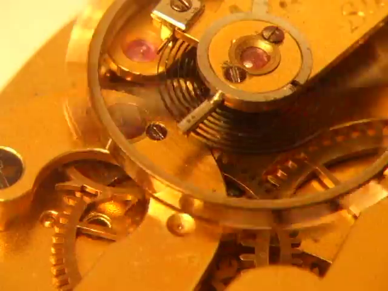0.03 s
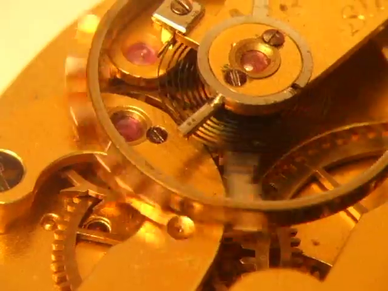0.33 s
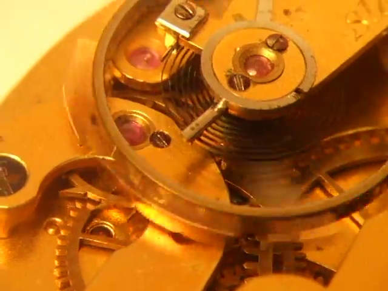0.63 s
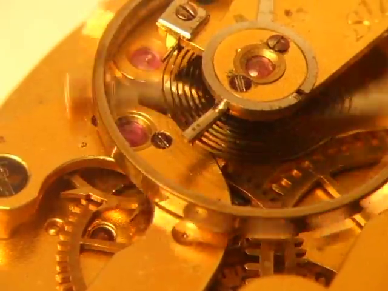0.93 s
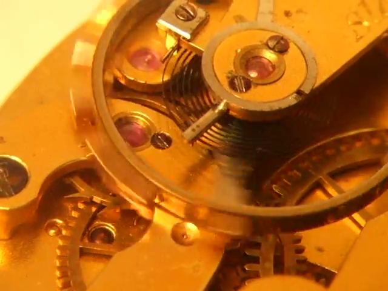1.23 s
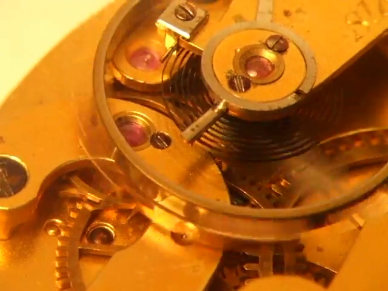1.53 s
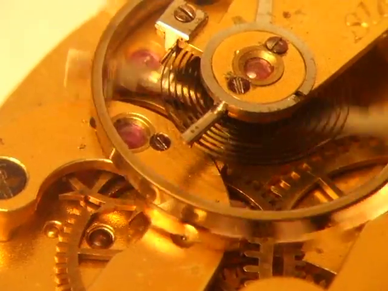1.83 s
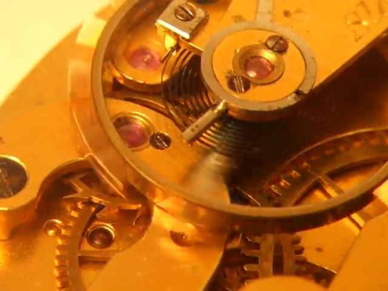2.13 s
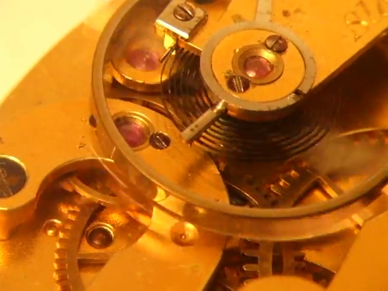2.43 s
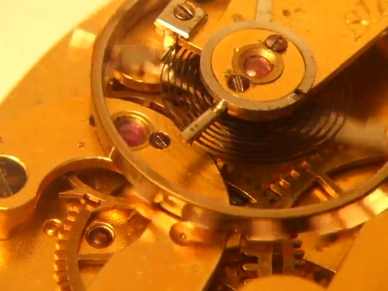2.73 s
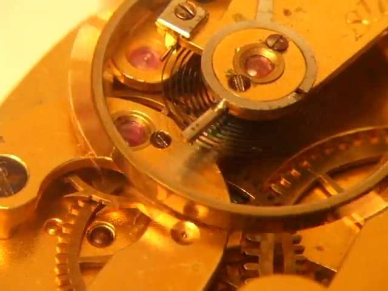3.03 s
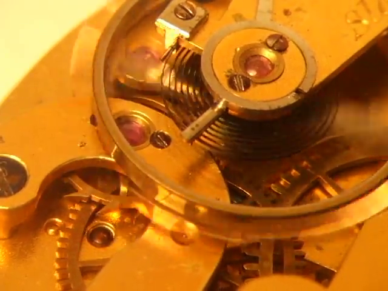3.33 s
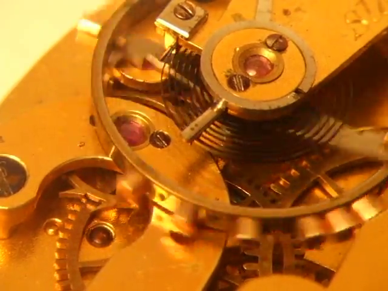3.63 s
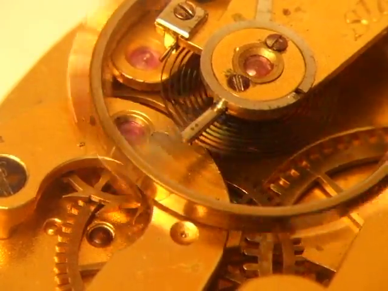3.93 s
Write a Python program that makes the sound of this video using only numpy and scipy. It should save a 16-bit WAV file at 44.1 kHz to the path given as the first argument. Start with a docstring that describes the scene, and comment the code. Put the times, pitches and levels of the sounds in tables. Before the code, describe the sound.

Quick, crisp ticking of an open pocket watch, close up, with soft hiss behind.

```python
"""Pocket watch, close up

An open watch beats 4.5 times a second: a strong tick, with a second contact 11 ms later, alternates
with a softer tock. Each contact chatters and rings the movement; a spring sings faintly in between.
Room hiss, hum and a thin electronic whine pass with it through a small camera's coarse 16 kHz converter."""
import sys
import numpy as np
from scipy import signal
from scipy.fft import rfft, irfft
from scipy.io import wavfile

SR = 44100
rng = np.random.default_rng(int(sys.argv[2]) if len(sys.argv) > 2 else 0)


def to_wav(s):
    """Save 16-bit WAV."""
    ch = np.atleast_2d(s).T  # columns
    pcm = np.round(np.clip(ch, -1, 1) * 32767)  # PCM
    wavfile.write(sys.argv[1], SR, pcm.astype(np.int16))


N = 176400
CONVERTER_HZ = 16000


def from_db(db):
    """Decibels to gain."""
    return 10 ** (np.asarray(db) / 20)


def clicks(times_s, levels_db):
    """Train of single-sample impulses."""
    out = np.zeros(N)
    index = np.round(np.ravel(times_s) * SR).astype(int)
    np.add.at(out, np.clip(index, 0, N - 1), from_db(np.ravel(levels_db)))
    return out


def ring(drive, hz, t60_s, band_hz=1650):
    """One decaying mode, band-passed so it swells over a few cycles and sounds thin."""
    radius = np.exp(-np.log(1000) / (t60_s * SR))
    angle = 2 * np.pi * hz / SR
    guard = 1e-18  # against denormals
    mode = signal.lfilter([0, np.sin(angle)], [1, -2 * radius * np.cos(angle), radius ** 2], drive + guard)
    edges_hz = [max(hz - band_hz / 2, hz / 2), hz + band_hz / 2]
    band = signal.butter(2, edges_hz, "band", fs=SR, output="sos")
    return signal.sosfilt(band, mode + guard * (np.arange(N) % 2))


# Hiss spectrum: frequency_hz, relative_density_db
HISS_SPECTRUM = [(25, 2.5), (50, 1), (90, -1), (280, 2.5), (430, 0.5), (570, 2), (750, -4.5), (1300, -8),
                 (2600, -12.5), (5000, -15.5), (7000, -10.5), (8000, -7)]


def hiss(rms_db=-56.5):
    """Steady room and microphone noise, strongest in the bass."""
    hz, density_db = np.transpose(HISS_SPECTRUM)
    bins_hz = np.maximum(np.arange(N // 2 + 1) * SR / N, 1)
    gain = from_db(np.interp(np.log(bins_hz), np.log(hz), density_db)) * (bins_hz < CONVERTER_HZ / 2)
    noise = irfft(rfft(rng.standard_normal(N)) * gain, N)
    return from_db(rms_db) * noise / noise.std()


# Room hum: pitch_hz, rms_db
HUM_TONES = [(120, -70), (158, -67.5), (236, -75), (314, -74.5), (800, -82.5)]
# Electronic whine: pitch_hz, rms_db
WHINE_TONES = [(7648, -81), (7678, -73), (7692, -78), (7707, -74), (7736, -82)]


def hum_and_whine():
    """Steady sines: low room hum and a thin electronic cluster near 7.7 kHz."""
    t = np.arange(N) / SR
    return sum(np.sqrt(2) * from_db(rms_db) * np.sin(2 * np.pi * (hz * t + rng.random()))
               for hz, rms_db in HUM_TONES + WHINE_TONES)


# Spring modes before a tock: pitch_hz, level_db, t60_s
PRE_TOCK_MODES = [(6835, -53.5, .1), (6760, -62, .03)]
# Spring modes after a tick: pitch_hz, level_db, t60_s
POST_TICK_MODES = [(2975, -59, .08), (5560, -61, .08), (6730, -58, .07), (6880, -59, .05), (7135, -56, .12)]


def spring(after_tick_s=.0347, before_tock_s=.0278, jitter_s=.001, spread_db=2.5):
    """Two light, uneven touches per full balance swing ring a spring, probably the hairspring."""
    touches = ((np.array(TICK_BEATS)[:, 0] + after_tick_s, POST_TICK_MODES),
               (np.array(TOCK_BEATS)[:, 0] - before_tock_s, PRE_TOCK_MODES))
    out = np.zeros(N)
    for times_s, modes in touches:
        for hz, level_db, t60_s in modes:
            late, loud = rng.standard_normal((len(times_s), 2)).T
            out += ring(clicks(times_s + jitter_s * late, level_db + spread_db * loud), hz, t60_s)
    return out


# Movement modes: pitch_hz, t60_s, tick_db, second_contact_db, tock_db
MOVEMENT_MODES = [(2986, .035, -50.5, -60.5, -65), (3420, 0.01, -42.5, -50.5, -59.5),
                  (3728, .014, -49.5, -47.5, -59), (4654, 0.026, -53.5, -51.5, -62.5),
                  (5617, 0.029, -46.5, -44.5, -52.5), (5910, 0.017, -41, -49.5, -55.5),
                  (6340, 0.014, -33.5, -47.5, -54), (6620, .014, -32.5, -44, -45),
                  (6890, .014, -32, -39.5, -43), (7123, 0.0024, -17, -28.5, -35.5),
                  (7355, 0.013, -36, -47, -54), (7515, .011, -30.5, -43, -44), (7530, .012, -33, -33, -38)]


def contact(times_s, levels_db, chatter, modes_db, jitter_s=.00009, spread_db=1.2, mode_spread_db=1.0):
    """Each contact is a few uneven impacts, each ringing every mode of the movement."""
    delay_s, relative_db = np.transpose(chatter)
    shape = (len(times_s), len(delay_s))
    uneven = delay_s != 0
    impact_s = times_s[:, None] + delay_s + jitter_s * rng.standard_normal(shape) * uneven
    impact_db = levels_db[:, None] + relative_db + spread_db * rng.standard_normal(shape) * uneven
    out = np.zeros(N)
    for (hz, t60_s, *_), mode_db in zip(MOVEMENT_MODES, modes_db):
        drive_db = impact_db + mode_db + mode_spread_db * rng.standard_normal(shape)
        out += ring(clicks(impact_s, drive_db), hz, t60_s)
    return out


# Strong beats: start_s, relative_db, second_contact_delay_s
TICK_BEATS = [(.2963, -1.5, .0112), (.7419, 1.5, .0103), (1.1862, 0, .0111), (1.6313, -.5, .0109),
              (2.0760, 0, .0111), (2.5212, 1.2, .0107), (2.9661, .4, .0115), (3.4113, 1.8, .011),
              (3.8561, -.2, .0109)]
# Soft beats, on the other pallet: start_s, relative_db
TOCK_BEATS = [(0.0804, 0.5), (0.524, -0.8), (0.9683, 1), (1.413, -0.5), (1.8594, -4.5), (2.3032, -5),
              (2.7506, -4), (3.1936, -1.8), (3.6389, -0.5)]
# Impacts within a tick, second contact and tock: delay_s, relative_db
TICK_IMPACTS = [(0, 0), (.00095, -7), (.0019, -19), (.0031, -16), (.0057, -22), (.0078, -26)]
SECOND_IMPACTS = [(-.001, -8), (0, 0), (.0013, -6), (.0025, -10)]
TOCK_IMPACTS = [(-.0004, -2), (.0005, 0), (.0014, -1), (.0024, -5)]


def escapement(tick_gain_db=6, second_gain_db=5.5, tock_gain_db=7.5):
    """Tick, second contact and tock strike the movement at different places, weighting its modes."""
    tick_s, tick_db, second_delay_s = np.transpose(TICK_BEATS)
    tock_s, tock_db = np.transpose(TOCK_BEATS)
    second_db = np.full(len(tick_s), second_gain_db)
    _, _, tick_modes_db, second_modes_db, tock_modes_db = np.transpose(MOVEMENT_MODES)
    return (contact(tick_s, tick_db + tick_gain_db, TICK_IMPACTS, tick_modes_db)
            + contact(tick_s + second_delay_s, second_db, SECOND_IMPACTS, second_modes_db)
            + contact(tock_s, tock_db + tock_gain_db, TOCK_IMPACTS, tock_modes_db))


# Stray clicks: start_s, level_db
STRAY_IMPACTS = [(0.6313, -28), (0.6398, -28)]


def stray_clicks():
    """Two tiny dry clicks between beats."""
    return ring(clicks(*np.transpose(STRAY_IMPACTS)), hz=6600, t60_s=.002)


def scene():
    """Watch over a quiet room, mono."""
    watch = escapement() + spring() + stray_clicks()
    return (watch + hiss() + hum_and_whine())[None]


def record(dry, step_db=-45.5, offset_steps=-.47, start_s=.032, fade_s=.008, cutoff_hz=9400):
    """Coarse converter steps make the hiss gritty; the smoothing filter mirrors some treble above 8 kHz."""
    up, down = 160, 441  # CONVERTER_HZ / SR
    smoothing = signal.firwin(32 * down + 1, 1 / down, window=("kaiser", 9))
    sampled = signal.resample_poly(dry, up, down, axis=1, window=smoothing)
    sampled = signal.sosfilt(signal.butter(2, 7900, fs=CONVERTER_HZ, output="sos"), sampled)
    step = from_db(step_db)
    quantized = step * np.round(sampled / step + offset_steps)
    smoothed = signal.resample_poly(quantized, down, up, axis=1, window=smoothing)[:, :N]
    fade_in = np.clip((np.arange(N) / SR - start_s) / fade_s, 0, 1)
    return signal.sosfilt(signal.butter(12, cutoff_hz, fs=SR, output="sos"), smoothed * fade_in)


dry = scene()
out = record(dry)
to_wav(out)
```